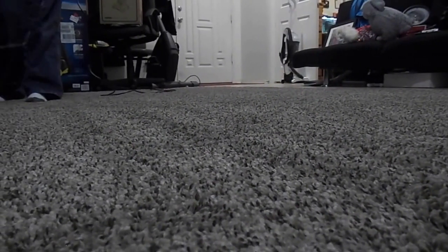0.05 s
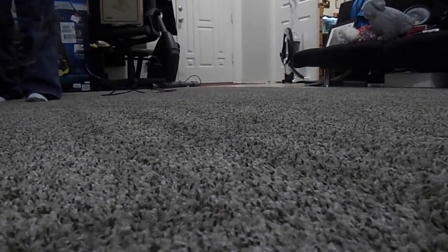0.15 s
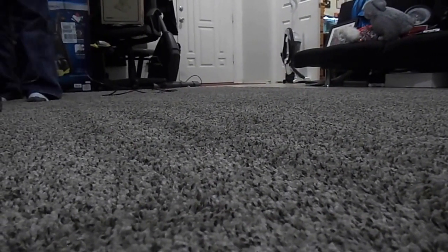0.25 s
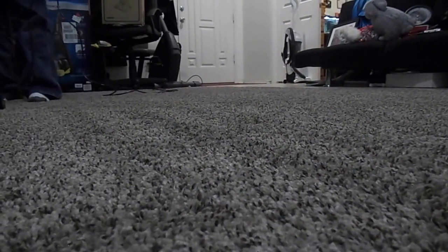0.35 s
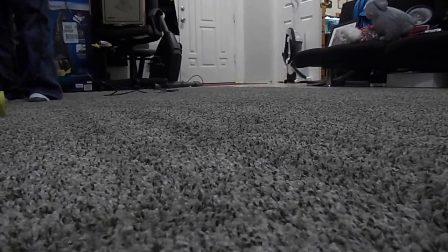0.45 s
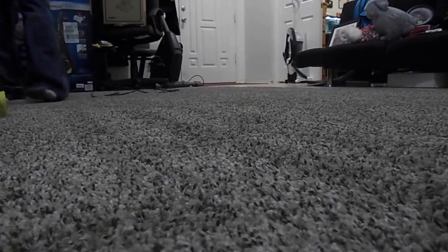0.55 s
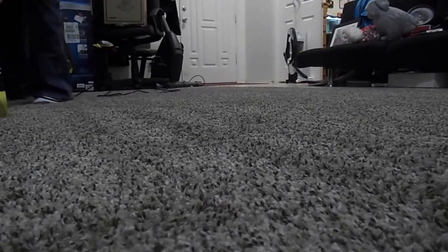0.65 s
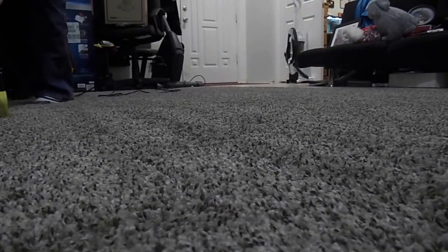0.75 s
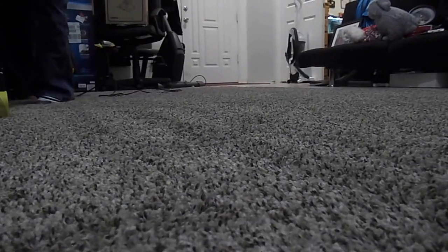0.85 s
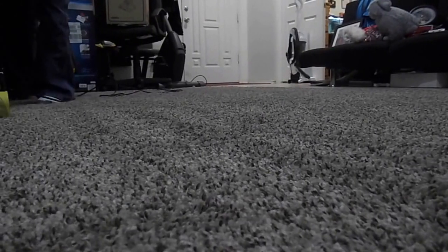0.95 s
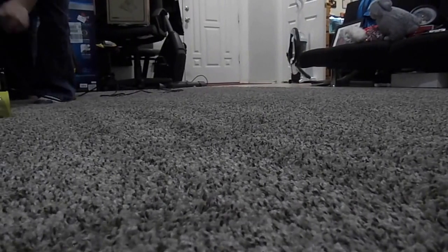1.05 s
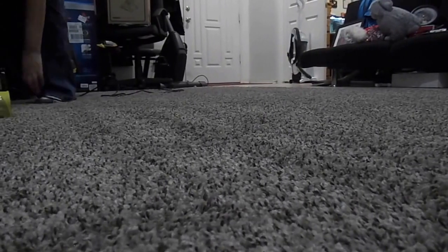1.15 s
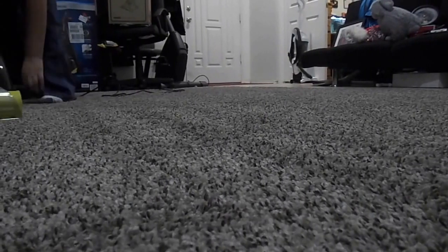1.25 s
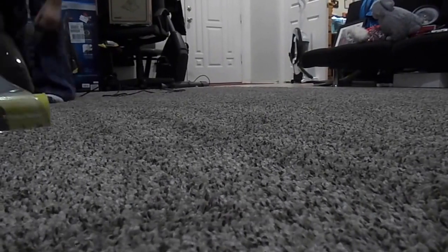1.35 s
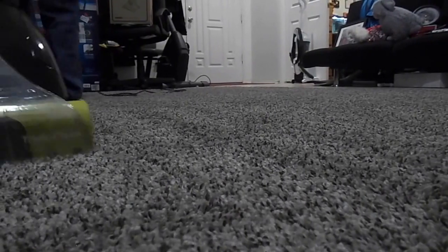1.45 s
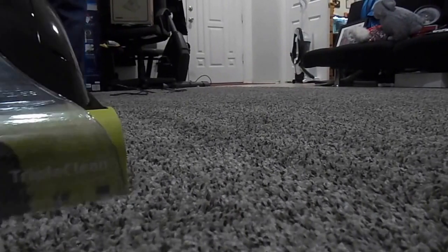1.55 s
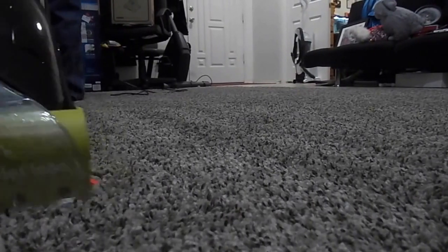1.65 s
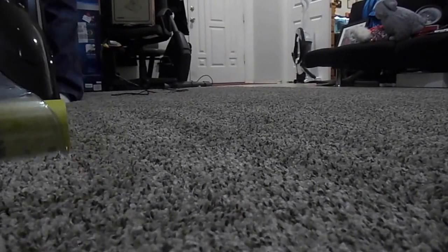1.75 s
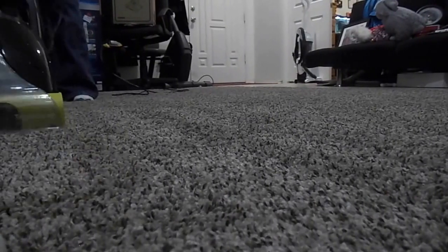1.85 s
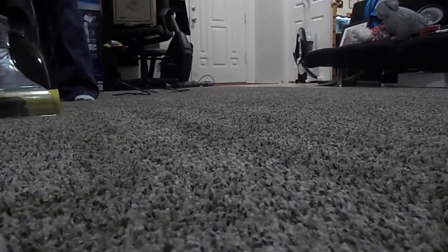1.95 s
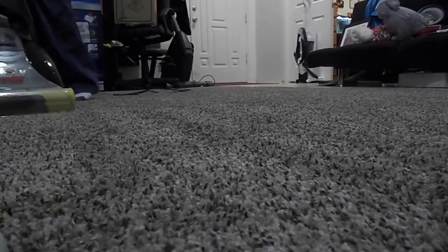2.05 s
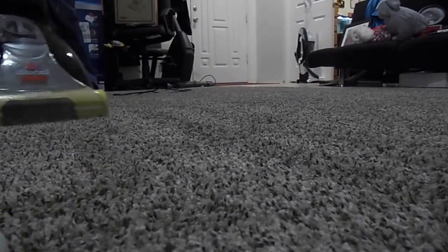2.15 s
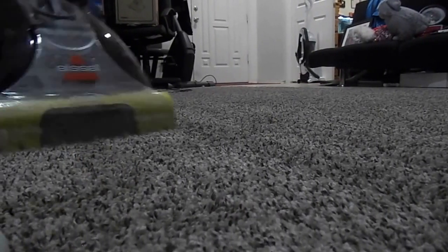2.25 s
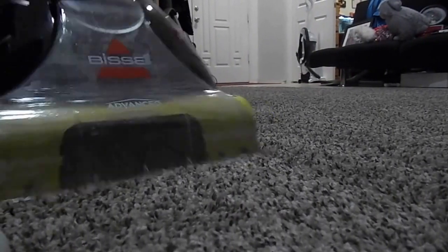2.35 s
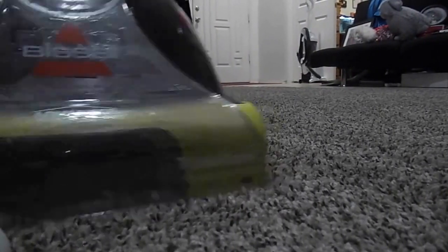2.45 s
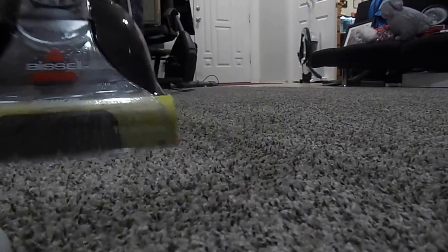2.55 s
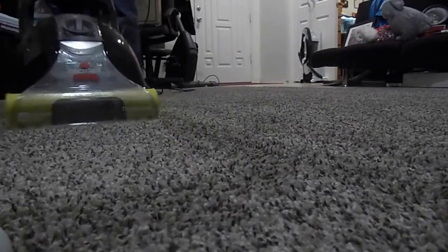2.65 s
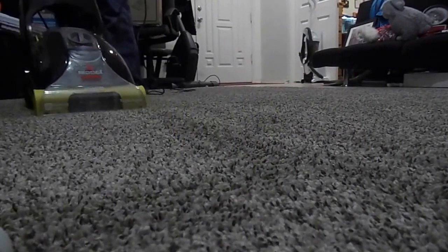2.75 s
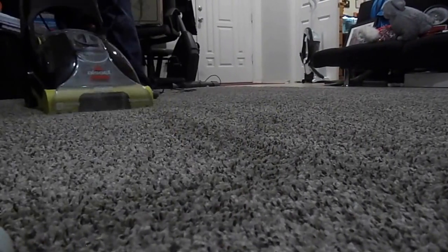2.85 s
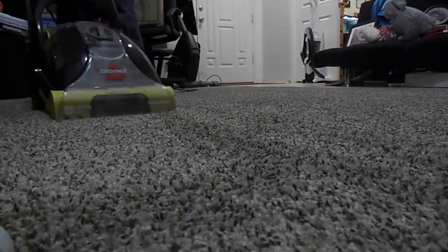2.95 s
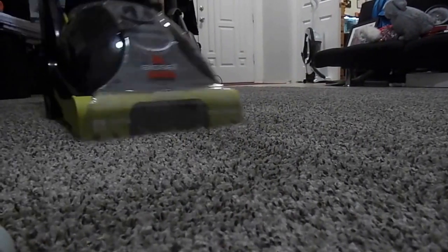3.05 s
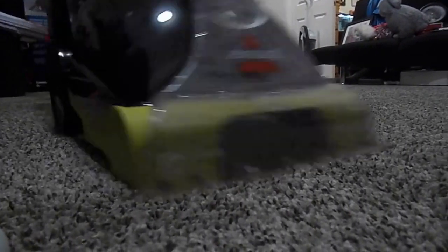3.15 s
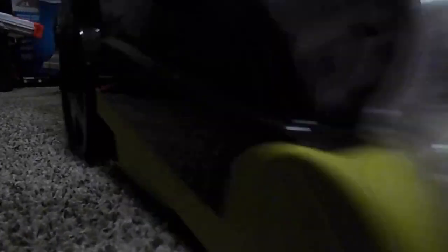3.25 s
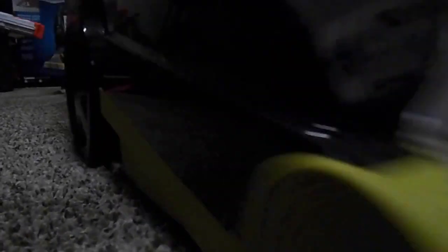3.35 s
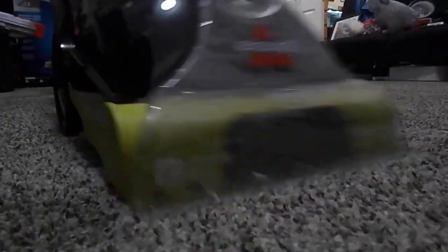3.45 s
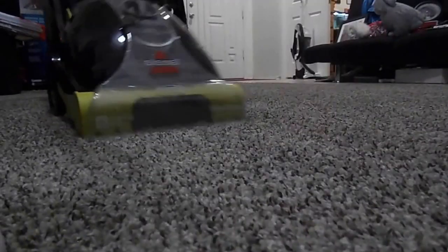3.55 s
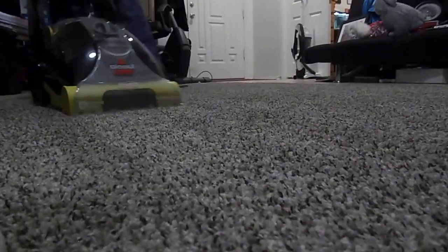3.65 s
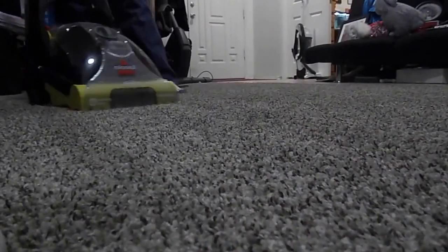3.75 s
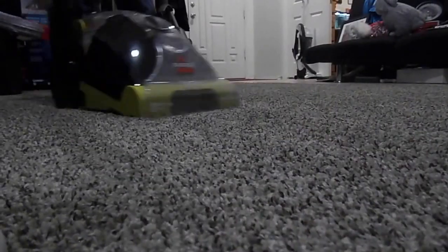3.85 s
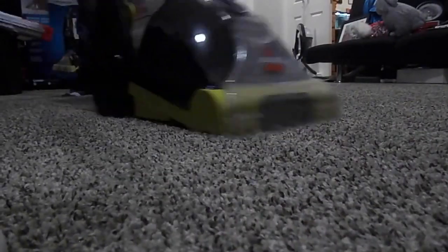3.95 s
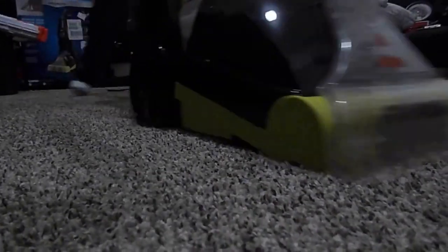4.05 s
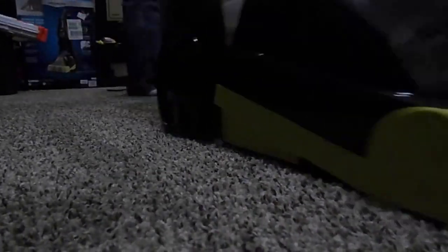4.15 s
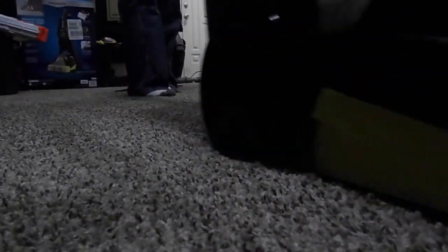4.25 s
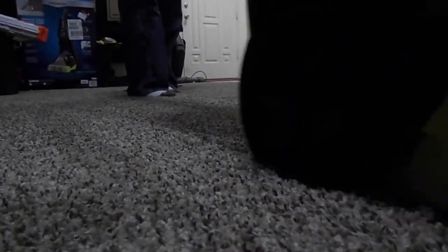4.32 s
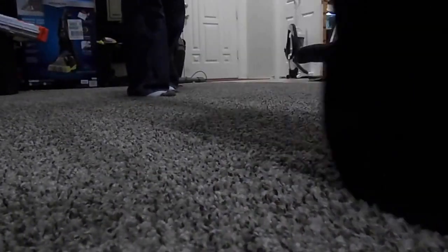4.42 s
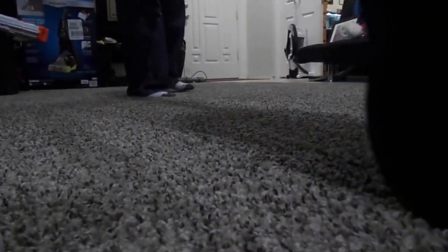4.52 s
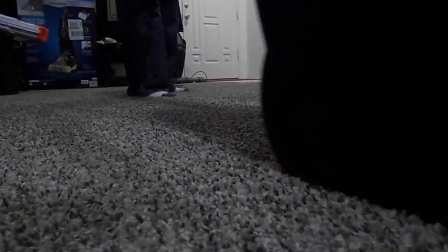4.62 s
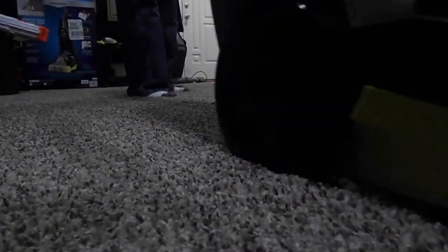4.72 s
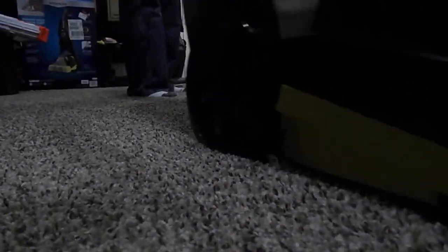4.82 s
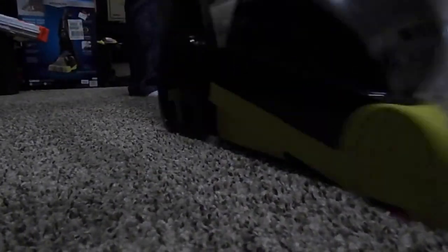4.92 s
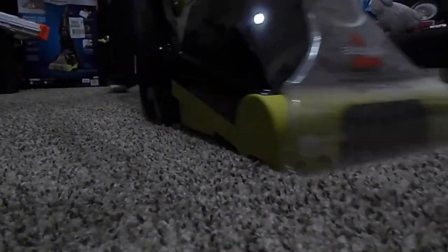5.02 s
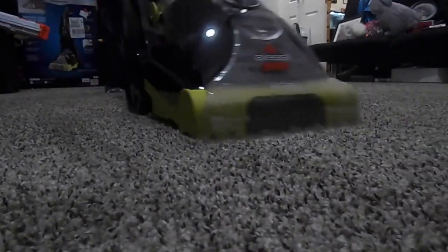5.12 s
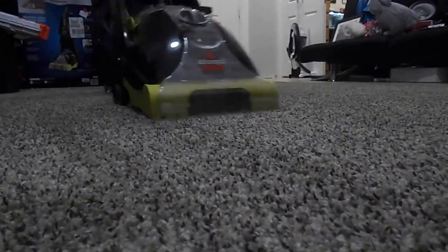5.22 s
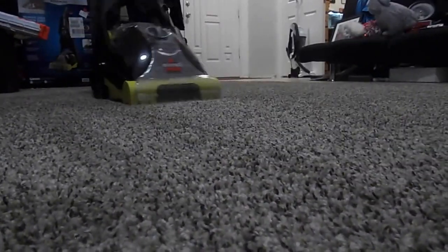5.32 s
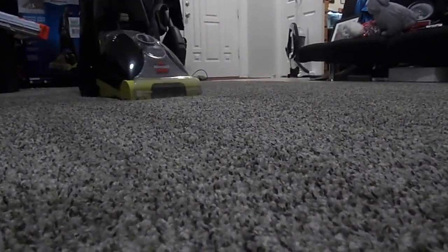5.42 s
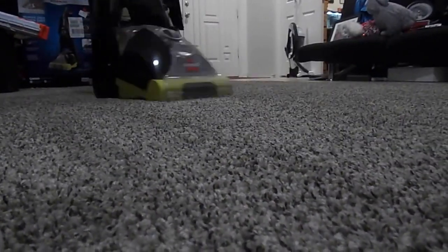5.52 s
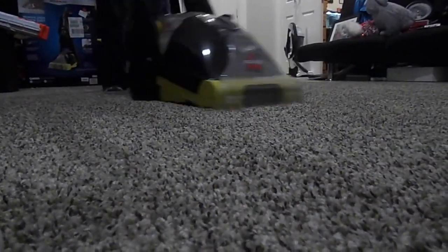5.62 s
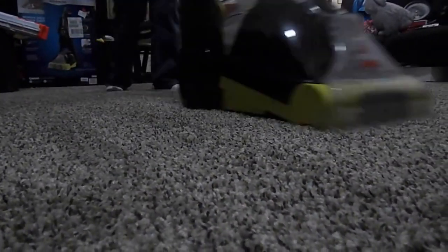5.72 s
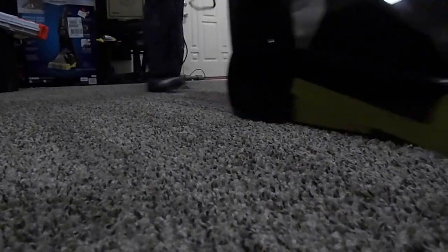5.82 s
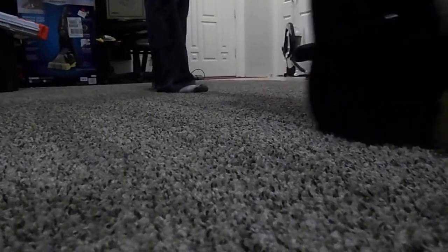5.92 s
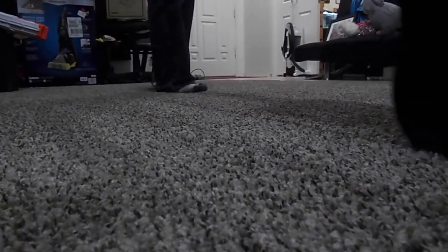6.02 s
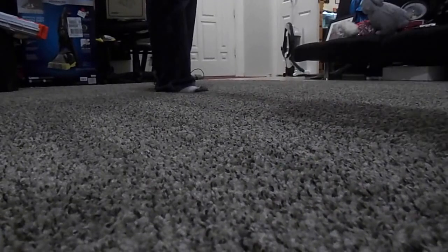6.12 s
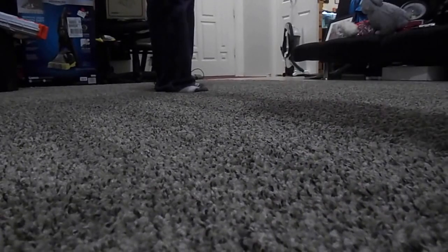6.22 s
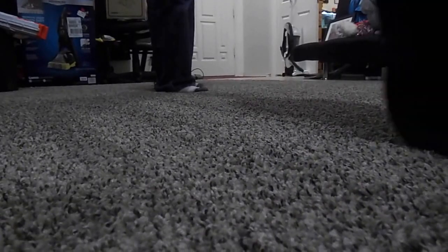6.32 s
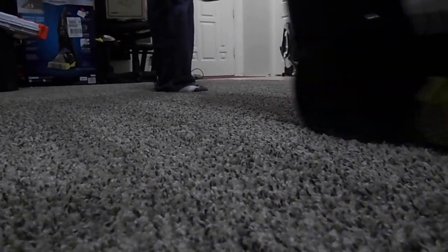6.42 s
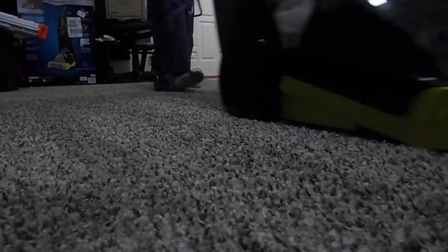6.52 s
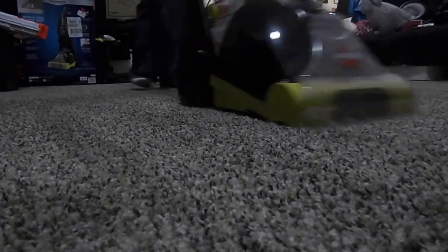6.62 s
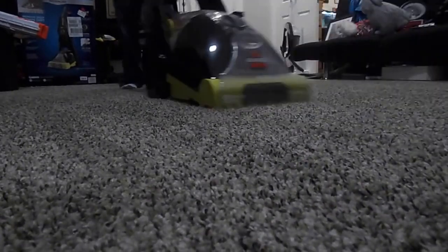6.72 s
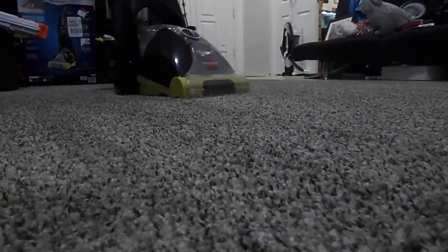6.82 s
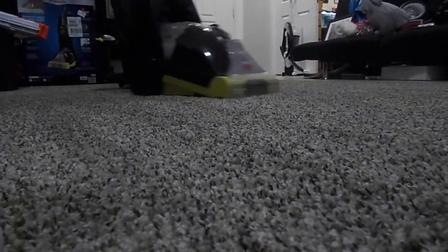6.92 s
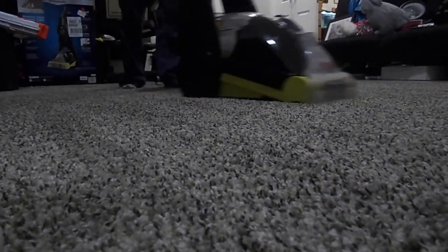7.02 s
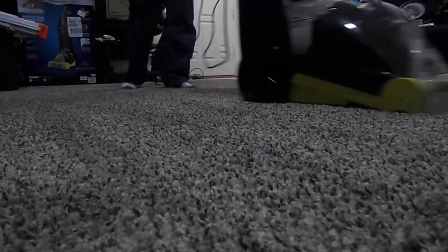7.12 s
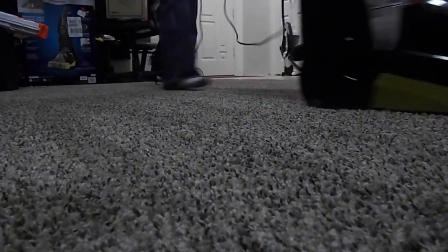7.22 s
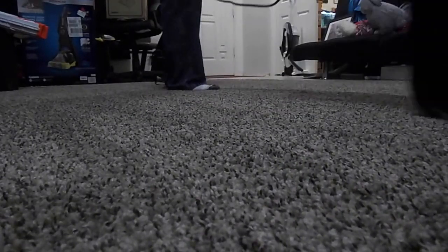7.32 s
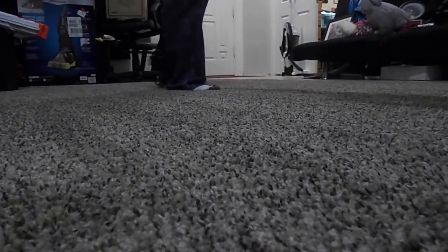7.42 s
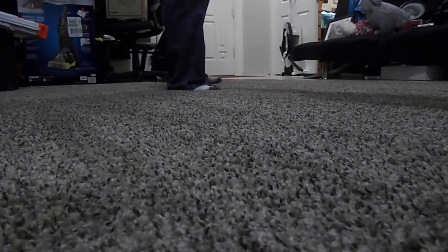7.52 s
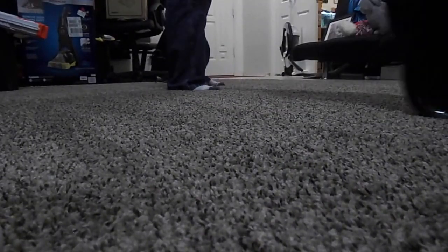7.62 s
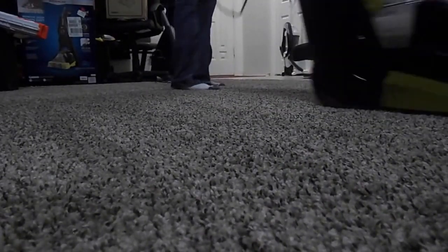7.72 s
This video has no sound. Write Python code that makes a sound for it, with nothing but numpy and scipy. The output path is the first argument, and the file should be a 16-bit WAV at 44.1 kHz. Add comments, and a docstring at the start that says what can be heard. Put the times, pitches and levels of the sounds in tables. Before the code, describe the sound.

A carpet cleaner is already running at full power and never stops over roughly 8 seconds, close to a floor microphone in a small carpeted room. A high, nearly fixed whine around 1.8 kHz rides on a midrange motor roar, with a slightly lower brush-drive ring strongest at the start. The first moment is near; the machine then backs off, and its hiss swells around 1.7 and 2.5 s. From 2.35 to 3.1 s it swings round, and the whine begins to vary with position. A very close, bright burst of air comes near 3.4 s, then recedes by 3.8. Longer passes follow: nozzle hiss peaks around 4.2, turns into side-vent rush near 4.5, returns near 4.8 and eases by 5.5. Another pass crosses around 5.9 to 6.5, retreats near 7, then a more distant one ends with the vent alongside. Carpet rumble stays faint.

```python
"""An upright carpet cleaner works to and fro past a microphone on the floor of a small room.
It starts angled away: the room alone carries most of the whine of its turbine, a blade tone with shaft lines.
From 2.35 to 3.1 s it swings round, and the whine then follows where it stands; the brush drive mostly fades.
From about 4 s longer pushes carry the nozzle past: its hiss gives way to the side vent's rush, then returns.
Throughout, shaped noise makes the motor's roar and a faint rumble of wheels and bristles in the pile."""
import sys
import numpy as np
from scipy import signal
from scipy.fft import rfft, irfft, next_fast_len
from scipy.io import wavfile
from scipy.ndimage import uniform_filter1d, map_coordinates

SR = 44100
rng = np.random.default_rng(int(sys.argv[2]) if len(sys.argv) > 2 else 0)


def inscribe(sig):
    """Save sig as 16-bit PCM at rate SR to the path in sys.argv[1].

    A 1-D sig is mono; a 2-D sig holds one channel per row.
    Samples are clipped to [-1, 1] before scaling.
    """
    pcm = np.round(np.clip(np.atleast_2d(sig).T, -1, 1) * 32767)
    wavfile.write(sys.argv[1], SR, pcm.astype(np.int16))


N = 342657

# blade tone at the start, its slow sag, and its drop under a forward push (a pull raises it)
WHINE_HZ, SAG_HZ_PER_S, LOAD_HZ_PER_M_S = 1793.8, 0.8, 1.2
BLADES = 5
# weaker lines of the turbine: (multiple of the shaft rate, level against the air noise [dB])
SHAFT_LINES = [(4, -21.5), (12, -25), (15, -37), (16, -40), (18, -25), (20, -33), (24, -38)]


def turbine(ahead, aside, speed, air_db):
    """Blades chop the air into a whine that sags slowly and under load, with less steady shaft lines."""
    pitch_hz = WHINE_HZ - SAG_HZ_PER_S * np.arange(N) / SR - LOAD_HZ_PER_M_S * speed
    turns = np.cumsum(pitch_hz / BLADES) / SR
    whine = amp(whine_level(ahead, aside)) * tone(BLADES * turns, scatter=0.16, rate=14)
    air_level = np.sqrt(sum(amp(db) ** 2 for db in air_db))
    lines = sum(amp(db) * tone(order * turns, scatter=1.1, rate=35) for order, db in SHAFT_LINES)
    return whine + air_level * lines


TURBINE_AT = (0.078, 0.16)  # (behind the nozzle [m], above or below the microphone [m])
WHINE_DB = -40.5  # at one metre
ROOM_WHINE_DB = -37  # the whine as the room alone carries it
WHINE_LAG_S = 0.014  # the standing waves take a moment to build up
# the body's shadow and standing waves weaken or lift the whine: (nozzle ahead [m], width [m], change [dB])
WHINE_ZONES = [(-0.5, 0.16, -10), (0.38, 0.12, 1.5), (0.65, 0.083, -7)]
# the machine swings round to face the microphone: (time [s], share heard directly [0 to 1])
FACING = [(2.35, 0.15), (3.1, 1.0)]


def whine_level(ahead, aside):
    """The blade tone in dB: nearly even while the machine is angled away, then set by where it stands."""
    facing, = curves(FACING)
    near_db, _ = heard_from(TURBINE_AT, ahead, aside)
    zones_db = sum(db * np.exp(-((ahead - place) / width) ** 2) for place, width, db in WHINE_ZONES)
    direct_db = WHINE_DB + near_db + zones_db
    level_db = ROOM_WHINE_DB + facing * (direct_db - ROOM_WHINE_DB)
    t = np.arange(N) / SR
    return np.interp(t - WHINE_LAG_S, t, level_db)


# colours of the three air noises: (frequency [Hz], relative level per Hz [dB])
ROAR_SPECTRUM = [(30, -100), (100, -78), (280, -50), (400, -36.5), (750, -8.5), (1200, -6), (1600, 2.5),
                 (2300, -9.5), (3800, -31.5), (5200, -22.5), (6600, -13), (8700, -19), (10200, -16),
                 (15700, -24.5)]
VENT_SPECTRUM = [(30, -95), (100, -72), (400, -33.5), (750, -24), (1200, -11.5), (1700, 2), (2300, -0.5),
                 (3900, 0.3), (5500, -17.5), (7000, -9), (8700, -30.5), (10000, -17.5), (15700, -15.5)]
NOZZLE_SPECTRUM = [(30, -95), (100, -77), (400, -36), (750, -32), (1200, -9), (1700, 0.0), (2300, -10),
                   (4300, -12), (5600, -15.5), (8000, -15.5), (9300, -27), (13500, -20.5), (15700, -32)]
# peaks and dips in the colour of each noise: (centre [Hz], width [Hz], height [dB])
ROAR_PEAKS = [(883, 22, 4.5), (1470, 97, -5), (3800, 160, -3), (12700, 400, 2), (13700, 400, 7)]
VENT_PEAKS = [(990, 320, 12.5), (2200, 180, 2.4), (3560, 160, 0.37), (9700, 490, 9.2)]
NOZZLE_PEAKS = [(1510, 91, 1.5), (2900, 1060, 5), (3690, 250, 5.5), (6860, 190, -5.5), (10230, 1100, 6),
                (11400, 830, -6.5)]


def airflow(roar_db, vent_db, nozzle_db):
    """Turbulent air: the motor's roar fills the room, while vent and nozzle rise with nearness."""
    roar = rush(ROAR_SPECTRUM, ROAR_PEAKS, ripple_db=3.0)
    # air forced through a narrow gap adds a thin, fuzzy whistle
    whistle = amp(-22.0) * band(centre_hz=6340, width_hz=90)
    vent = rush(VENT_SPECTRUM, VENT_PEAKS, ripple_db=1.2)
    vent = floor_bounce(vent, vent_db, near_delay_ms=0.336, shrink_per_db=0.24, strength=0.099)
    nozzle = rush(NOZZLE_SPECTRUM, NOZZLE_PEAKS, ripple_db=2.0)
    # the pile soaks up the slot's bright rush, which only comes through close by
    slot_db = -11.5 + 0.99 * (nozzle_db - nozzle_db.max())
    slot = amp(slot_db) * band(centre_hz=4470, width_hz=390)
    return amp(roar_db) * (roar + whistle) + amp(vent_db) * vent + amp(nozzle_db) * (nozzle + slot)


# seats on the machine: (behind the nozzle [m], above or below the microphone [m])
NOZZLE_AT, MOTOR_AT, VENT_AT = (0.0052, 0.062), (0.2, 0.34), (0.32, 0.26)
NOZZLE_DB, ROAR_DB, VENT_DB = -42, -40.5, -35  # at one metre; the roar's level is further faded by the turning below
ROOM_ROAR_DB = -41.5  # the roar that fills the room, before the same fade
ROAR_TURN_SHARE = 0.16  # how far the roar follows the brush drive's level
VENT_END_ON_DB = -12  # the vent blows sideways, so it is this much weaker from the front


def air_levels(ahead, aside):
    """Roar, vent and nozzle in dB: each falls with distance, and the vent beams to the side."""
    drive_db, = curves(DRIVE_LEVEL)
    motor_db, _ = heard_from(MOTOR_AT, ahead, aside)
    roar = np.hypot(amp(ROOM_ROAR_DB), amp(ROAR_DB + motor_db))
    roar_db = 20 * np.log10(roar) + ROAR_TURN_SHARE * drive_db
    vent_db, end_on = heard_from(VENT_AT, ahead, aside)
    nozzle_db, _ = heard_from(NOZZLE_AT, ahead, aside)
    return roar_db, VENT_DB + vent_db + VENT_END_ON_DB * end_on, NOZZLE_DB + nozzle_db


ROLL_AT = (0.2, 0.53)  # the wheels' seat: (behind the nozzle [m], above or below the microphone [m])
ROLL_DB, IDLE_ROLL_DB = -90, -99  # rumble at 1 m/s and one metre, and of the brush alone, before its wobble
ROLL_GROWTH = 0.6  # power of the speed by which the rumble grows
# steady tones of the brush drive: (frequency [Hz], level before the drive's fade [dB])
DRIVE = [(760.8, -69.5), (1521.6, -47.5)]
# the drive's level as its side of the machine turns: (time [s], level [dB])
DRIVE_LEVEL = [(0, 10), (0.6, 4), (1.9, 4.5), (2.7, -1), (4.8, -5.5), (6, -21), (7, -15.5), (7.77, -14)]
# colour of the rumble in the pile: (frequency [Hz], relative level per Hz [dB])
PILE = [(25, -26), (45, -24), (75, -28), (130, -8), (250, 5.5), (380, -1), (700, -16)]


def brush(ahead, aside, speed):
    """The brush drive hums and rings its casing while wheels and bristles rumble over the carpet."""
    hum = sum(amp(db) * tone(hz * np.arange(N) / SR, scatter=0.93, rate=14) for hz, db in DRIVE)
    casing = amp(-47.0) * band(centre_hz=1460, width_hz=58)
    drive_db, = curves(DRIVE_LEVEL)
    near_db, _ = heard_from(ROLL_AT, ahead, aside)
    rolling = amp(ROLL_DB + near_db) * np.abs(speed) ** ROLL_GROWTH
    roll_level = np.hypot(amp(IDLE_ROLL_DB), rolling) * amp(1.4 * wobble(14))
    rumble = unit(filtered(rng.standard_normal(N), lambda hz: amp(along(PILE, hz))))
    # a multiple of the mains frequency, too low for the body to shade it
    mains = amp(-77) * tone(480 * np.arange(N) / SR, scatter=0.45, rate=6)
    return mains + amp(drive_db) * (hum + casing) + roll_level * rumble


EASE = 0.49  # share of each stroke that slows smoothly into the turn
# where each push or pull ends: (time [s], nozzle short of the microphone [m], negative = past it, aside [m])
STROKES = [(-0.04, 0.097, 0.24), (0.479, 0.64, 0.31), (1.34, 0.5, 0.4), (1.66, 0.13, 0.19),
           (2.15, 0.67, 0.38), (2.51, 0.12, 0.17), (2.9, 0.84, 0.13), (3.38, 0.01, 0.095),
           (3.799, 0.67, 0.22), (4.549, -0.45, 0.12), (5.551, 0.69, 0.23), (6.22, -0.52, 0.31),
           (6.97, 0.64, 0.35), (7.41, -0.41, 0.82), (7.9, -0.47, 0.63)]


def travel():
    """The nozzle's place (ahead m, aside m) and forward speed (m/s), easing from stroke to stroke."""
    s, ahead, aside = np.transpose(STROKES)
    index = np.arange(len(s))
    stroke = np.interp(np.arange(N) / SR, s, index)
    eased = np.floor(stroke) + (1 - np.cos(np.pi * (stroke % 1))) / 2
    progress = stroke + EASE * (eased - stroke)
    ahead, aside = np.interp(progress, index, ahead), np.interp(progress, index, aside)
    return ahead, aside, -np.gradient(ahead) * SR


def heard_from(seat, ahead, aside):
    """A source's gain over one metre (dB), and how end-on it is seen (0 = broadside, 1 = end-on)."""
    behind, height = seat
    distance = np.sqrt((ahead + behind) ** 2 + aside ** 2 + height ** 2)
    return -20 * np.log10(distance), ((ahead + behind) / distance) ** 2


def floor_bounce(x, level_db, near_delay_ms, shrink_per_db, strength):
    """Adds a floor echo whose lag shrinks as the source gets louder, so its comb notches sweep up."""
    nearness_db = level_db - level_db.max()
    lag = near_delay_ms * np.exp(-shrink_per_db * nearness_db) * SR / 1000  # samples
    echo = map_coordinates(x, [np.arange(N) - lag])
    return (x + strength * echo) / np.hypot(1, strength)


def rush(spectrum, peaks, ripple_db):
    """Turbulent air of rms 1, coloured by a spectrum with its peaks and dips."""
    def response(hz):
        duct_db = sum(db / (1 + (2 * (hz - centre) / width) ** 2) for centre, width, db in peaks)
        return amp(along(spectrum, hz) + duct_db)
    return unit(filtered(room_noise(ripple_db), response))


def room_noise(ripple_db, size=2048):
    """White noise with the fine peaks and dips of room echoes, drifting slowly at random."""
    z = signal.stft(rng.standard_normal(N), nperseg=size)[2]
    # smoothed over 2 frequency bins and 30 frames
    field = uniform_filter1d(rng.standard_normal(z.shape), size=2, axis=0)
    field = uniform_filter1d(field, size=30, axis=1)
    return signal.istft(z * amp(ripple_db * unit(field)), nperseg=size)[1][:N]


def band(centre_hz, width_hz):
    """Noise of rms 1 ringing in one resonance, with steep skirts; half amplitude at width_hz off centre."""
    return unit(filtered(rng.standard_normal(N), lambda hz: 1 / (1 + ((hz - centre_hz) / width_hz) ** 4)))


def tone(cycles, scatter, rate):
    """A line of rms 1: the direct tone plus echoes of drifting strength and phase."""
    echoes = scatter * (wobble(rate) + 1j * wobble(rate))
    return unit(np.real((1 + echoes) * np.exp(2j * np.pi * cycles)))


def wobble(rate):
    """A smooth random curve, rate knots a second."""
    return map_coordinates(rng.standard_normal(int(N * rate / SR) + 4), [np.arange(N) * rate / SR])


def filtered(x, response):
    """x shaped by a gain at each frequency."""
    m = next_fast_len(N + SR // 2)
    return irfft(rfft(x, m) * response(np.fft.rfftfreq(m, 1 / SR)), m)[..., :N]


def along(points, hz):
    """(frequency [Hz], value) points read on a log axis."""
    f, v = np.transpose(points)
    return np.interp(np.log(hz + 1), np.log(f + 1), v)


def curves(rows):
    """One value per sample for each column after the time."""
    s, *cols = np.transpose(rows)
    return [np.interp(np.arange(N) / SR, s, c) for c in cols]


def amp(db):
    """Decibels to gain."""
    return 10 ** (np.asarray(db) / 20)


def unit(x):
    """Scaled to rms 1."""
    return x / np.sqrt(np.mean(x ** 2) + 1e-20)


def scene():
    """The whole machine, moved by its strokes and alike in both channels."""
    ahead, aside, speed = travel()
    air_db = air_levels(ahead, aside)
    machine = turbine(ahead, aside, speed, air_db) + airflow(*air_db) + brush(ahead, aside, speed)
    return np.array([machine, machine])


TOP_HZ = 15750


def record(dry):
    """The microphone's chain keeps nothing from its band limit up."""
    return filtered(dry, lambda hz: hz < TOP_HZ)


dry = scene()
out = record(dry)
inscribe(out)
```